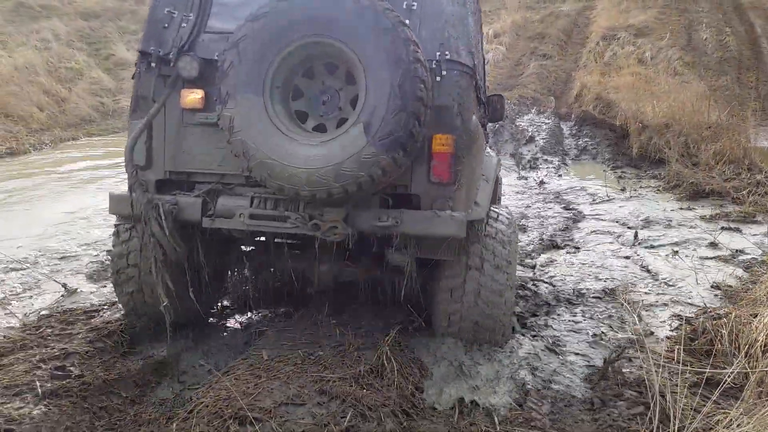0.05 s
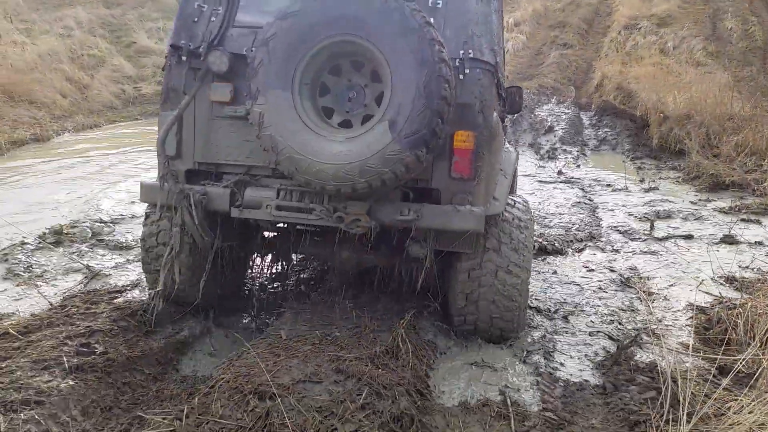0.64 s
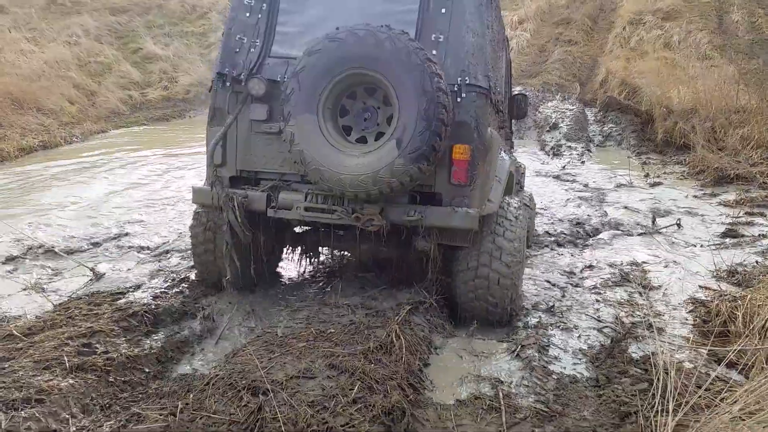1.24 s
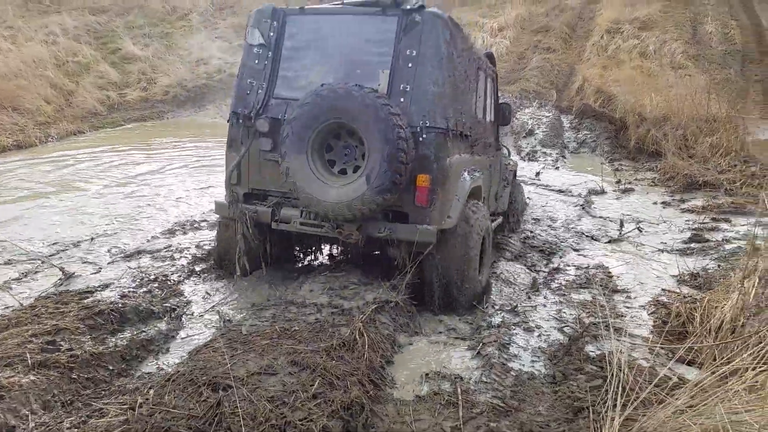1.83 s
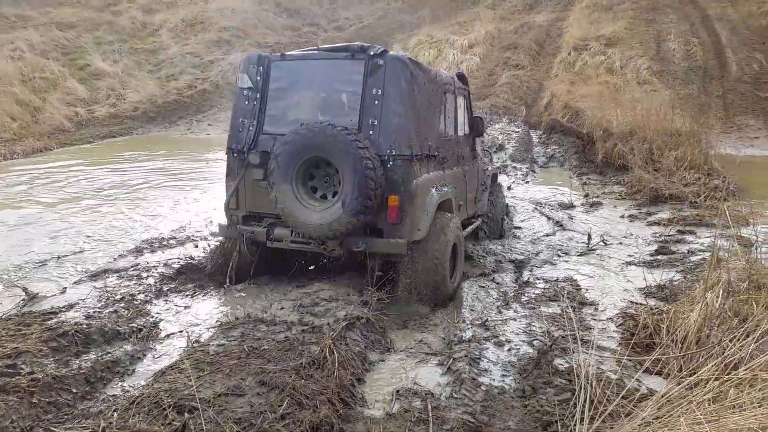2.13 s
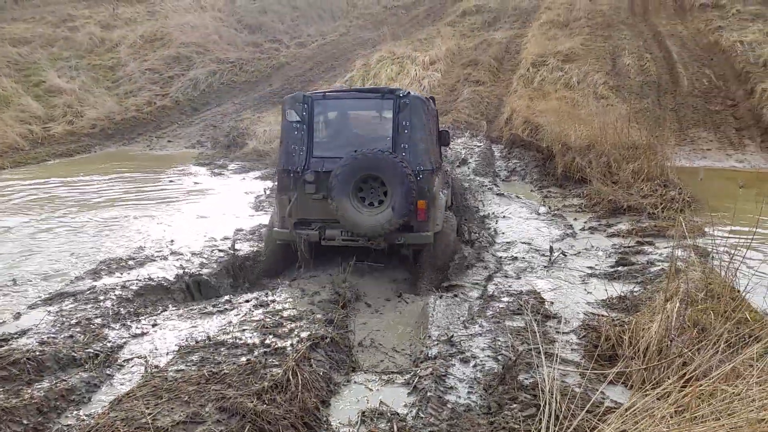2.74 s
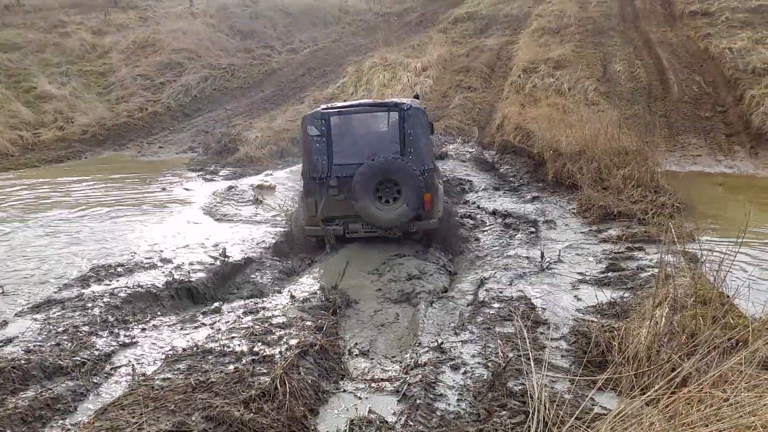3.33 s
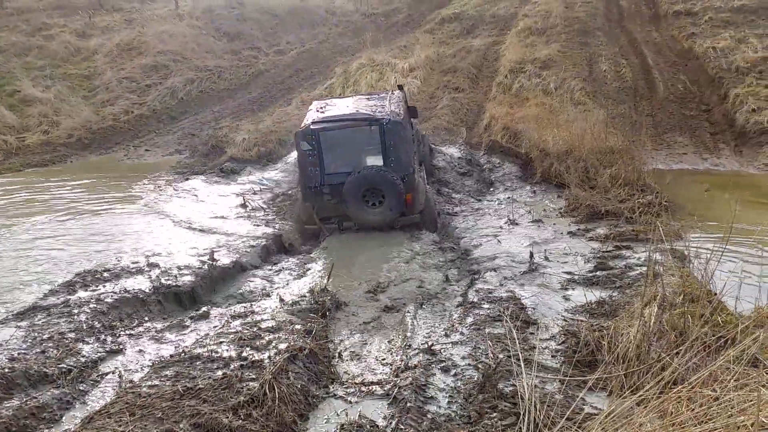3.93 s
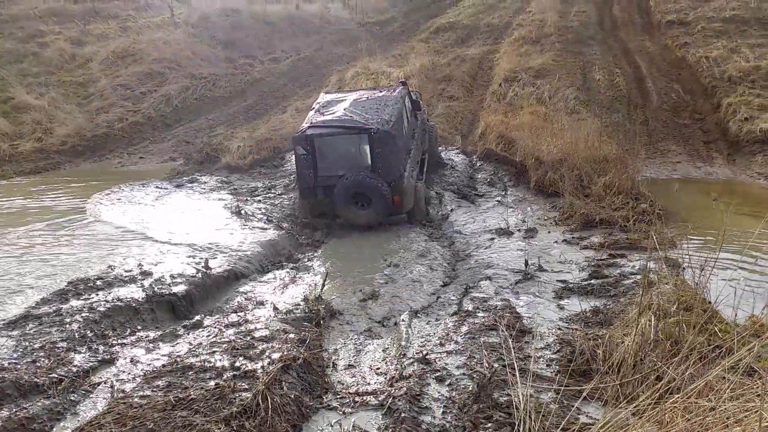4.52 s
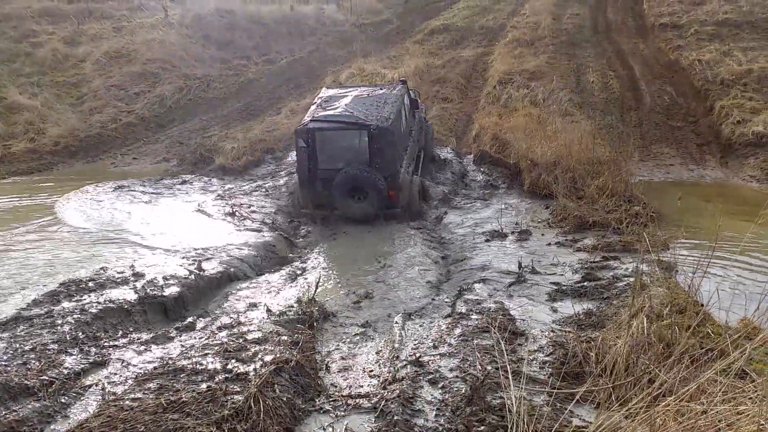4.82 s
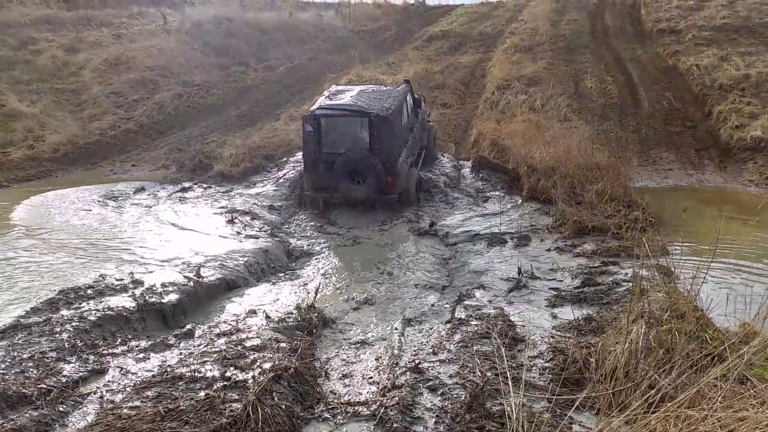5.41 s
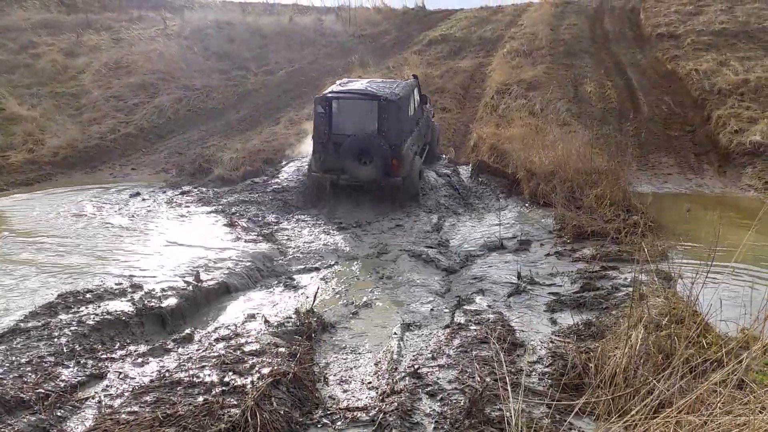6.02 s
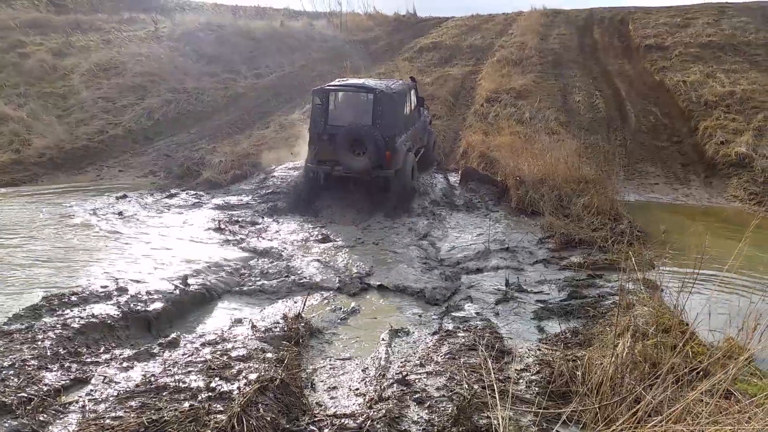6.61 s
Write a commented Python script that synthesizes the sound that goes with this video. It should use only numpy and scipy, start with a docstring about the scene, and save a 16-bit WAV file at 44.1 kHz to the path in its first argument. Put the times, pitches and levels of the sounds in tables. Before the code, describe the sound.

An off-road vehicle's engine sags, then revs and drones as its tyres churn through mud and splash into water, the exhaust gurgling.

```python
"""A four-cylinder off-roader, outdoors, from behind. The revs sag with the throttle shut: the exhaust
coughs, a thin whistle falls, loose metal clacks. At 1.3 s the throttle opens amid thin squeals and the
car pulls away, engine bay clattering and hissing, tyres churning mud. Just after 3 s the wheels splash
and it wades out into a pool. The exhaust drone, harmonics of the firing rate, gurgles, blurts and
chokes; from 4.4 s the tailpipe sinks and loses its fundamental, then starts to rise near the end."""
import sys
import numpy as np
from scipy import signal
from scipy.fft import rfft, irfft, next_fast_len
from scipy.io import wavfile
from scipy.ndimage import uniform_filter1d, minimum_filter1d

SR = 44100
rng = np.random.default_rng(int(sys.argv[2]) if len(sys.argv) > 2 else 0)


def log_audio(samples):
    """Write samples as a 16-bit WAV file to the path given in sys.argv[1]."""
    # one column per channel
    frames = np.atleast_2d(samples).T
    # limit to full scale, then quantise
    limited = np.clip(frames, -1, 1)
    pcm = np.round(limited * 32767).astype(np.int16)
    wavfile.write(sys.argv[1], SR, pcm)


N = 293706
TIME_S = np.arange(N) / SR

# engine speed: t/s, firing rate/Hz
FIRING_RATE = [(0.0, 85.5), (0.3, 84), (0.74, 65), (0.96, 50.8), (1.13, 55), (1.22, 56), (1.45, 72),
               (1.61, 81), (1.82, 88.4), (2.3, 82), (2.69, 92.7), (3.45, 85.7), (3.75, 91.5), (4.06, 81.5),
               (4.62, 81.6), (4.9, 69), (5.38, 65.4), (5.71, 71.1), (6.16, 69.6), (6.66, 82)]
# loudness of tyre churn and engine clatter, ducking where the drone is loudest:
# t/s, churn level/dB, clatter level/dB
NOISE_LEVELS = [(0, -31.5, -31.5), (.18, -31, -32.5), (.3, -39, -36.5), (.55, -38, -38.5), (.8, -45, -43),
                (1.22, -41.5, -42.5), (1.55, -35, -33), (1.9, -34, -33), (2.3, -30.5, -32.5),
                (2.8, -28, -31.5), (3.12, -31.5, -34), (3.35, -27.5, -32), (3.56, -31, -36.5),
                (3.8, -31.5, -35.5), (4.2, -32, -35.5), (5.1, -30.5, -34), (5.55, -34, -36.5),
                (6.03, -38.5, -43.5), (6.35, -34, -38), (6.66, -34, -35)]
# brighter to duller, wetter engine and tyre noise; about half until 3.3 s, full by 3.8 s: t/s, blend/0-1
WET_BLEND = [(3.3, 0.54), (3.8, 1)]
# gas bursts in the pipe: centre t/s, length/s, ring f/Hz, harmonic lift/dB, ring level/dB
GAS_BURSTS = [(1.456, 0.37, 168, 13, -40), (2.942, 0.089, 100, -0.5, -17), (3.582, 0.15, 200, 14, -22.5),
              (4.075, 0.16, 239.6, 1, -15.5), (4.281, 0.094, 139.9, 12.5, -18),
              (4.438, 0.11, 146.8, 10, -31), (4.696, 0.074, 239.6, -1, -19),
              (4.85, 0.066, 209.8, 16.5, -14), (5.09, 0.066, 200.7, 10.5, -20), (5.5, 0.17, 118, 1, -26)]


def gain(db):
    """dB to amplitude."""
    return 10 ** (np.asarray(db) / 20)


def unit_rms(x):
    """Scale to rms 1."""
    return x / np.sqrt(np.mean(x ** 2) + 1e-20)


def at_hz(table, hz):
    """Interpolate a table over log frequency."""
    table_hz, values = np.transpose(table)
    return np.interp(np.log(hz + 1), np.log(table_hz + 1), values)


def curves(table):
    """Interpolate each value column over time, per sample."""
    times_s, *columns = np.transpose(table)
    return [np.interp(TIME_S, times_s, column) for column in columns]


def swell(centre_s, length_s):
    """Gaussian hump, height 1, full width length_s at half height."""
    return .5 ** ((2 * (TIME_S - centre_s) / length_s) ** 2)


def swells(table):
    """Summed gain of several humps."""
    return sum(gain(db) * swell(centre_s, length_s) for centre_s, length_s, db in table)


def add(mix, start_s, sound):
    """Mix a sound in at start_s."""
    part = mix[..., max(round(start_s * SR), 0):][..., :sound.shape[-1]]
    part += sound[..., :part.shape[-1]]


def filtered(x, response):
    """FFT filter; response is a function of f/Hz."""
    size = next_fast_len(x.shape[-1] + 2048, True)
    hz = np.fft.rfftfreq(size, 1 / SR)
    return irfft(rfft(x, size) * response(hz), size)[..., :x.shape[-1]]


def coloured(x, spectrum):
    """Filter by a dB spectrum, then scale to rms 1."""
    return unit_rms(filtered(x, lambda hz: gain(at_hz(spectrum, hz))))


def wander(cutoff_hz, step=8):
    """Low-passed noise, rms 1."""
    size = next_fast_len(N // step + 2, True)
    hz = np.fft.rfftfreq(size, step / SR)
    slow = irfft(rfft(rng.standard_normal(size)) / (1 + (hz / cutoff_hz) ** 4), size)
    return unit_rms(np.interp(np.arange(N) / step, np.arange(size), slow))


def stereo(a, b):
    """Left and right from two independent noises: most alike in the low mids, least in the treble."""
    # f/Hz, coherence/0-1
    coherence = [(30, .4), (70, .6), (150, .85), (280, .92), (600, .92), (1100, .8), (2000, .35),
                 (4000, .2), (8000, .07), (15000, .04)]
    common = filtered(a, lambda hz: at_hz(coherence, hz))
    separate = filtered(b, lambda hz: np.sqrt(1 - at_hz(coherence, hz) ** 2))
    return np.array([a, common + separate])


def grainy(drops_per_s, spread_db, share):
    """Stereo noise with a share of its power in droplets of uneven size."""
    sizes = gain(spread_db * np.minimum(rng.exponential(1, (2, N)), 4))
    signs = rng.choice([-1, 1], (2, N))
    drops = unit_rms(sizes * signs * (rng.random((2, N)) < drops_per_s / SR))
    return stereo(*(np.sqrt(share) * drops + np.sqrt(1 - share) * rng.standard_normal((2, N))))


def resonance(hz, width_hz):
    """Narrow noise band around a fixed or moving pitch, rms 1."""
    phase = 2 * np.pi * np.cumsum(hz * np.ones(N)) / SR
    return unit_rms(wander(width_hz / 2) * np.cos(phase) + wander(width_hz / 2) * np.sin(phase))


def whistle():
    """Thin whistle that falls and rises with the first dip in revs, then fades."""
    # t/s, f/Hz, level/dB
    track = [(0, 15800, -53), (.25, 15000, -47), (.45, 13200, -41), (.65, 11700, -49), (.9, 10200, -55),
             (1.1, 9300, -59), (1.3, 9700, -53), (1.5, 10500, -57), (1.7, 11500, -75)]
    hz, db = curves(track)
    return gain(db) * np.array([resonance(hz, width_hz=1007) for _ in range(2)])


def squeals(attack_s=.025, rise_hz=450, rise_s=.15):
    """Thin squeals that creep up in pitch as they die."""
    # t/s, start f/Hz, level/dB, t60/s
    events = [(1.18, 15000, -26.5, .5), (1.52, 15350, -35, .25), (1.72, 15210, -33, 1.0)]
    out = np.zeros((2, N))
    for start_s, start_hz, db, t60_s in events:
        age_s = np.maximum(TIME_S - start_s, 0)
        hz = start_hz + rise_hz * (1 - np.exp(-age_s / rise_s))
        envelope = np.minimum(age_s / attack_s, 1) * gain(db - 60 * age_s / t60_s)
        out += envelope * np.array([resonance(hz, width_hz=700) for _ in range(2)])
    return out


def gear_whine():
    """Gears whine in two fixed bands."""
    # t/s, level/dB
    levels = [(0, -40.5), (.7, -45.5), (1, -51), (3, -54), (6.1, -53), (6.3, -40.5), (6.6, -33.5)]
    bands = resonance(1240, width_hz=330) + gain(-6.5) * resonance(2100, width_hz=320)
    return gain(curves(levels)[0]) * bands


def panel_drone():
    """A body panel resonates in swells."""
    # centre t/s, length/s, level/dB
    events = [(1.87, 0.24, -35), (2.8, 0.44, -32), (3.39, 0.11, -20.5)]
    return swells(events) * resonance(590, width_hz=97)


def clacks(scrape_db=1, attack_s=.00044):
    """Loose metal knocks on the chassis: a short scrape and ringing modes."""
    # t/s, level/dB, scrape t60/s, tilt/(dB/octave)
    knocks = [(0.577, -26, 0.14, 2), (.697, -26.5, 0.07, -5.5), (1.938, -36, 0.057, 3),
              (5.525, -39.5, 0.039, 8.5)]
    # f/Hz, relative level/dB
    scrape_spectrum = [(500, -25), (1250, -7), (1800, -5), (2550, -8), (3300, -15), (4800, 0), (6500, -10),
                       (9000, -6.5), (13000, -6), (16000, -3)]
    # f/Hz, level/dB, t60/s
    modes = [(1180, -7, 0.12), (1316, -6, 0.1), (2630, -6.5, 0.047), (2720, -9, 0.11), (5100, -10, 0.15),
             (5230, -30, .08), (8300, -13, 0.087), (12100, -9, .08)]
    out, age_s = np.zeros((2, N)), np.arange(SR // 5) / SR
    attack = 1 - np.exp(-age_s / attack_s)
    for start_s, db, t60_s, tilt_db in knocks:
        tilted = [(hz, band_db + tilt_db * np.log2(hz)) for hz, band_db in scrape_spectrum]
        scrape = coloured(rng.standard_normal((2, len(age_s))), tilted)
        scrape *= gain(scrape_db - 60 * age_s / t60_s)
        ring = 0
        for hz, mode_db, mode_t60_s in modes:
            envelope = gain(mode_db + tilt_db * np.log2(hz / 3000) - 60 * age_s / mode_t60_s)
            ring += envelope * np.sin(2 * np.pi * (hz * age_s + rng.random((2, 1))))
        add(out, start_s, gain(db) * (scrape + ring) * attack)
    return out


def hiss():
    """Rushing air and fine spray follow the clatter level; the spray fades as the wet blend rises."""
    # f/Hz, relative level/dB
    air_spectrum = [(1760, -22), (3000, 2.5), (3400, -3.5), (3970, 2), (5510, -1.5), (6740, -3), (7640, -1),
                    (10500, -5.5), (11600, -1.5), (14200, -2), (15100, 4.5), (15900, -17)]
    spray_spectrum = [(4000, -82), (9000, -23), (12000, -4), (13300, 0), (14300, -8), (15500, 3),
                      (16000, -15)]
    clatter_db, wet = curves(NOISE_LEVELS)[1], curves(WET_BLEND)[0]
    air_db = clatter_db - 3 - .5 * wet + .98 * wander(13.5)
    air = coloured(grainy(3000, spread_db=4, share=.19), air_spectrum)
    spray_db = clatter_db - 4 - 9 * wet + 1.2 * wander(30.53)
    spray = coloured(grainy(1500, spread_db=3, share=.4), spray_spectrum)
    return gain(air_db) * air + gain(spray_db) * spray


def splashes():
    """A wheel throws sheets of muddy water."""
    # centre t/s, length/s, level/dB
    events = [(3.16, 0.13, -34), (3.29, 0.09, -33)]
    # f/Hz, relative level/dB
    spectrum = [(150, -60), (400, -21), (620, -17), (900, -22), (1600, 1.5), (2400, -2), (4000, -10),
                (9000, -17), (16000, -35)]
    envelope = swells(events) * gain(2 * wander(40))
    return envelope * coloured(grainy(600, spread_db=3.17, share=.51), spectrum)


def crank_rattle(firings, size=256):
    """Random waveform that repeats each crank turn (two firings) and slowly changes shape."""
    position = firings / 2 * size % size
    shapes = [np.interp(position, np.arange(size), rng.standard_normal(size)) for _ in range(3)]
    weights = np.array([wander(2.5) for _ in shapes])
    return unit_rms((weights * shapes).sum(0) / np.sqrt((weights ** 2).sum(0) + .1))


def growl(firings, noise, rattle):
    """Noise mixed with crank rattle; less rattle as the wet blend rises."""
    share = rattle * (1 - .75 * curves(WET_BLEND)[0])
    return np.sqrt(share) * crank_rattle(firings) + np.sqrt(1 - share) * noise


def mud_churn(firings):
    """Tyres slop through mud in lumps, over the growl of the block."""
    # f/Hz, relative level/dB
    early_spectrum = [(100, -70), (250, -9), (410, -6), (490, -9.5), (590, -1), (720, -6), (880, -3.5),
                      (1100, -8), (1800, -61), (4000, -120)]
    wet_spectrum = [(100, -68), (250, -31), (380, -6), (470, 2.5), (600, 1.5), (720, -2.5), (880, -5.5),
                    (1100, -10), (1800, -46), (4000, -120)]
    level_db, wet = curves(NOISE_LEVELS)[0], curves(WET_BLEND)[0]
    drive = growl(firings, grainy(500, spread_db=3, share=.3), rattle=.17)
    slop = (1 - wet) * coloured(drive, early_spectrum) + wet * coloured(drive, wet_spectrum)
    lumps_db = wander(25)
    return gain(level_db + lumps_db) * slop


def engine_clatter(firings):
    """Engine-bay noise beats with the crank and changes colour with the wet blend."""
    # f/Hz, relative level/dB
    early_spectrum = [(500, -59), (850, -6), (1030, 8.5), (1390, -10.5), (1550, -3.5), (1680, 4.5),
                      (1930, -6), (2120, -11.5), (2480, -6), (2650, -4), (2810, -24), (3100, -7),
                      (3600, -12.5), (4680, -51), (7920, -120)]
    wet_spectrum = [(500, -51), (850, -8), (1030, -9), (1230, 0.5), (1340, -4), (1590, -2), (1690, -4),
                    (1840, -12), (2070, -3.5), (2340, -10), (2570, -7), (2780, -10), (3020, -10.5),
                    (3330, -14.5), (3600, -12.5), (4680, -23), (7920, -120)]
    level_db, wet = curves(NOISE_LEVELS)[1], curves(WET_BLEND)[0]
    drive = growl(firings, grainy(900, spread_db=3, share=.45), rattle=.33)
    clatter = (1 - wet) * coloured(drive, early_spectrum) + wet * coloured(drive, wet_spectrum)
    beat_db = .11 * np.cos(np.pi * firings) + wander(41)
    return gain(level_db + beat_db) * clatter


def pipe_hoots(rate_hz):
    """The tailpipe hoots briefly at multiples of the firing rate."""
    # centre t/s, length/s, multiple, level/dB
    events = [(1.39, .14, 4.5, -30), (2.616, 0.24, 3.5, -21.5), (3.487, 0.18, 3.5, -22.5),
              (3.74, 0.19, 3.5, -31), (6.168, 0.22, 5, -33), (6.5, 0.28, 4, -35)]
    return sum(gain(db) * swell(centre_s, length_s) * resonance(multiple * rate_hz, width_hz=12.5)
               for centre_s, length_s, multiple, db in events)


def pipe_blurts():
    """Each gas burst sets the pipe ringing roughly."""
    return sum(gain(db) * swell(centre_s, length_s) * resonance(hz, width_hz=65)
               for centre_s, length_s, hz, _, db in GAS_BURSTS)


def exhaust_coughs(level_db=-9, right_db=-7, attack_s=.0014, decay_s=.018):
    """Dull off-throttle puffs in the pipe, close on the left."""
    # t/s, relative level/dB
    events = [(0.198, -12), (0.241, -4.5), (0.259, -1.5), (0.281, -3), (0.297, -12), (0.334, -13),
              (0.5, -14.5), (0.529, -10), (0.551, -16), (0.724, -13.5), (0.744, -16.5), (0.77, -18.5),
              (0.835, -12.5), (0.864, -16.5), (0.967, -14), (1.005, -12), (1.065, -16), (1.223, -16),
              (1.266, -9.5), (1.352, -14), (1.383, -15.5)]
    # f/Hz, relative level/dB
    spectrum = [(30, -6), (80, 14.5), (200, 5.5), (380, -0.5), (600, -9), (850, -21.5), (1500, -46),
                (4000, -68), (9000, -110)]
    out, age_s = np.zeros((2, N)), np.arange(SR // 8) / SR
    envelope = (1 - np.exp(-age_s / attack_s)) * np.exp(-age_s / decay_s)
    for start_s, db in events:
        puff = coloured(rng.standard_normal((2, len(age_s))), spectrum) * envelope
        add(out, start_s, gain(db + level_db) * unit_rms(puff))
    return out * gain([[0], [right_db]])


def uneven_firing(firings):
    """An impulse of random strength and a puff of noise per firing."""
    fired = np.diff(np.floor(firings), prepend=0)
    puff = .5 + np.exp(-(firings % 1) / .13)
    return unit_rms(fired * rng.standard_normal(N)) + .76 * unit_rms(puff * rng.standard_normal(N))


def exhaust_burble(firings, rate_hz):
    """Uneven firings throb in the silencer and gurgle in the wet pipe."""
    # t/s, throb level/dB, gurgle level/dB
    levels = [(0, -21.5, -29.5), (1.35, -24, -31.5), (1.6, -26.5, -29.5), (2.35, -35, -29),
              (2.55, -24, -23), (3.4, -27, -23.5), (4.5, -23, -29), (5.3, -25.5, -21.5), (5.75, -23, -30),
              (5.95, -34, -27), (6.66, -31, -31)]
    # f/Hz, relative level/dB
    throb_spectrum = [(8, -45), (30, -5), (50, -1), (75, 7), (105, 2), (150, 7.5), (185, 0.5), (250, -60),
                      (600, -120)]
    gurgle_spectrum = [(30, -80), (110, -40), (160, -7), (190, 6), (230, 0.5), (280, -2.5), (325, -7),
                       (385, -18), (600, -42), (1500, -120)]
    pipe_response = [(100, -4), (220, 4), (270, 0.5), (312, 1.5), (340, -0.5), (380, -20)]
    # weak lines from unequal cylinders: multiple of firing rate, level re gurgle/dB
    side_lines = [(1.5, -6.5), (2.5, -8), (3.5, -7), (4, -9.5)]
    throb_db, gurgle_db = curves(levels)
    throb = coloured(stereo(uneven_firing(firings), uneven_firing(firings)), throb_spectrum)
    gurgle = coloured(stereo(uneven_firing(firings), uneven_firing(firings)), gurgle_spectrum)
    lines = 0
    for multiple, db in side_lines:
        line = np.sqrt(2) * np.cos(2 * np.pi * multiple * firings + .5 * wander(4))
        lines += gain(db + at_hz(pipe_response, multiple * rate_hz)) * line
    damping_db = curves(WET_BLEND)[0]
    return gain(throb_db) * throb + gain(gurgle_db) * gurgle + gain(gurgle_db - damping_db) * lines


def exhaust_drone(firings, rate_hz, throttle_opens_s=1.31, opening_s=.025, lift_octaves=.61):
    """Firing harmonics, dull until the throttle opens; water chokes them and drowns the fundamental."""
    # blowing strength: t/s, level/dB
    effort = [(0, -20), (.55, -20.5), (1.05, -30.5), (1.3, -26), (1.6, -22), (2.2, -23), (2.75, -15),
              (3.3, -13.5), (3.8, -19.5), (4.7, -20), (5.35, -13.5), (5.97, -10), (6.15, -13), (6.66, -14)]
    # tailpipe under water: t/s, depth/0-1
    immersion = [(3.3, 0.06), (3.55, 0), (4.4, 0.1), (4.85, 0.8), (5.9, 0.99), (6.3, 0.95), (6.66, 0.47)]
    # multiple of firing rate, level re effort/dB, change when shut/dB, change when submerged/dB
    harmonics = [(1, 3.5, 1, -16.5), (2, -.5, -6, 1.5), (3, -3, -2.5, 1)]
    # f/Hz, gain/dB
    silencer = [(55, -2), (72, -5), (83, -1.5), (91, -1), (135, 1), (160, -1), (172, 2.5), (186, -6.5),
                (200, -3.5), (215, -1.5), (240, -4), (255, -14), (275, -10.5)]
    # water slaps over the pipe: centre t/s, length/s, gain/dB
    chokes = [(3.702, .07, -4), (4.185, 0.041, -5), (4.35, 0.047, -3), (4.588, 0.073, -3),
              (5.03, 0.045, -6.5), (5.159, 0.043, -6)]
    effort_db, depth = curves(effort)[0], curves(immersion)[0]
    shut = .5 - .5 * np.tanh((TIME_S - throttle_opens_s) / opening_s)
    choke_db = sum(db * swell(centre_s, length_s) for centre_s, length_s, db in chokes)
    note = 0
    for multiple, level_db, shut_db, submerged_db in harmonics:
        hz = multiple * rate_hz
        db = effort_db + level_db + at_hz(silencer, hz)
        db += shut_db * shut + submerged_db * depth + choke_db
        for centre_s, length_s, ring_hz, lift_db, _ in GAS_BURSTS:
            near_ring = np.exp(-(np.log2(hz / ring_hz) / lift_octaves) ** 2)
            db += lift_db * swell(centre_s, length_s) * near_ring
        db += (.68 + .6 * depth) * wander(8.4)  # slosh deepens the waver
        lag_rad = .85 * (multiple - 1) ** 1.54
        note += gain(db) * np.sqrt(2) * np.cos(2 * np.pi * multiple * firings - lag_rad)
    return note


def scene():
    """Stereo sum; one firing count drives drone, burble, churn and clatter."""
    # tailpipe, close on the left at first: t/s, left minus right/dB
    pipe_balance = [(0, .8), (.25, 1.5), (.6, 4), (1.25, 5.5), (1.5, .6), (6.66, 0)]
    rate_hz = curves(FIRING_RATE)[0]
    firings = np.cumsum(rate_hz * (1 + .003 * wander(20))) / SR
    exhaust = exhaust_drone(firings, rate_hz) + exhaust_burble(firings, rate_hz) + pipe_blurts()
    exhaust *= gain(np.outer([.5, -.5], curves(pipe_balance)[0]))
    noises = exhaust_coughs() + mud_churn(firings) + engine_clatter(firings) + hiss() + splashes()
    tones = whistle() + gear_whine() + panel_drone() + pipe_hoots(rate_hz) + squeals()
    return exhaust + noises + tones + clacks()


def limited(x, ceiling=.92, window_samples=1200):
    """Smooth peak limiter, channels linked."""
    needed_gain = np.minimum(1, ceiling / (abs(x).max(0) + 1e-9))
    return x * uniform_filter1d(minimum_filter1d(needed_gain, window_samples), window_samples)


def record(dry):
    """The car reaches the left side sooner and louder; then limiter and low-pass."""
    # f/Hz, left minus right/dB
    balance = [(60, .4), (200, .7), (320, 2), (550, 5.5), (1000, 7.5), (2000, 6), (3000, 3.5), (4500, 0),
               (5700, 3), (7500, 13), (9500, 7), (12000, 0), (15500, 0)]
    # f/Hz, left phase lead/rad
    lead = [(0, 0), (45, .1), (85, .25), (150, .45), (220, .52), (330, .7), (600, .8), (1100, 1.5),
            (2100, 1.5), (4200, 2.2), (8000, 2.3), (13000, 0)]
    left = filtered(dry[0], lambda hz: gain(at_hz(balance, hz) / 2))
    right = filtered(dry[1], lambda hz: gain(-at_hz(balance, hz) / 2) * np.exp(-1j * at_hz(lead, hz)))
    lowpass = signal.firwin(1023, cutoff=15950, window=("kaiser", 9), fs=SR)
    return signal.oaconvolve(limited(np.array([left, right])), lowpass[None], "same")


dry = scene()
out = record(dry)
log_audio(out)
```